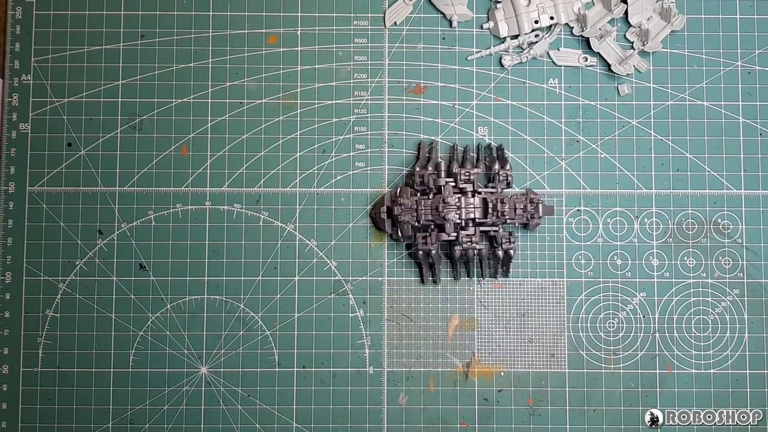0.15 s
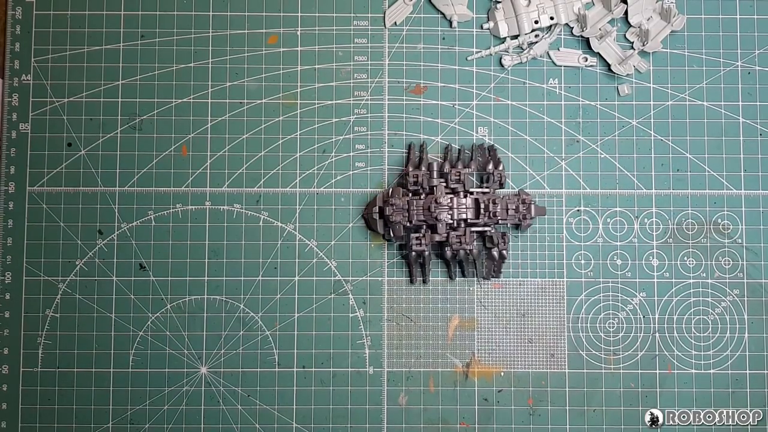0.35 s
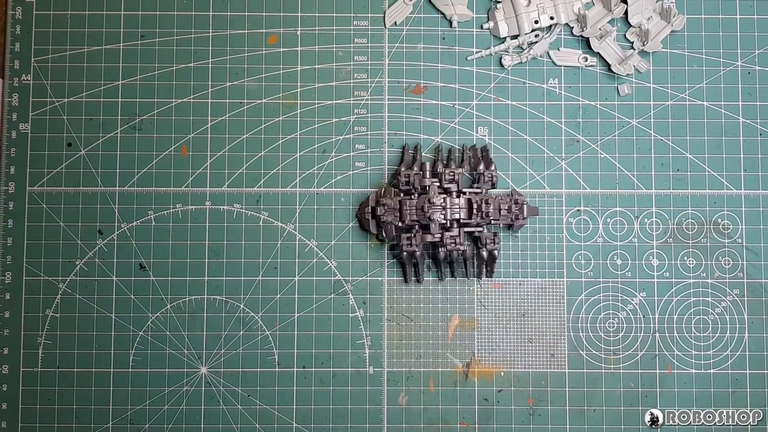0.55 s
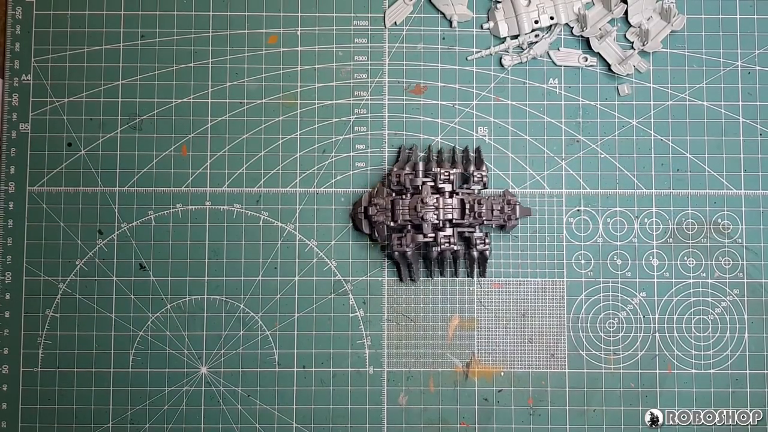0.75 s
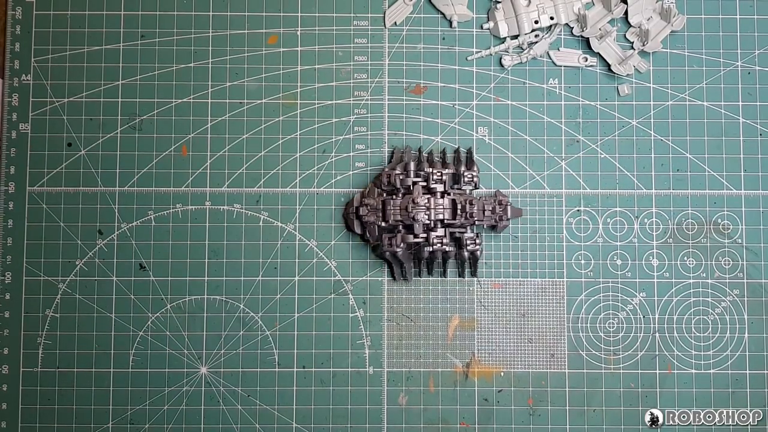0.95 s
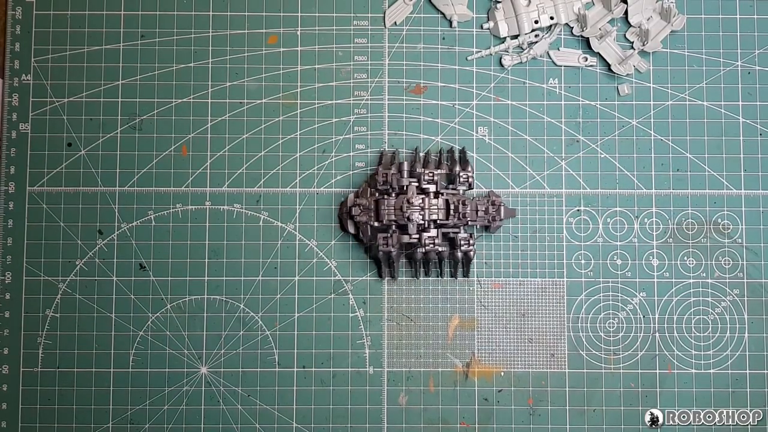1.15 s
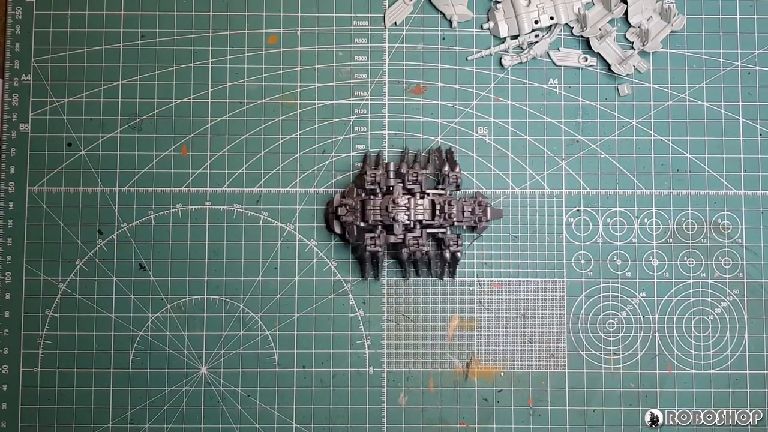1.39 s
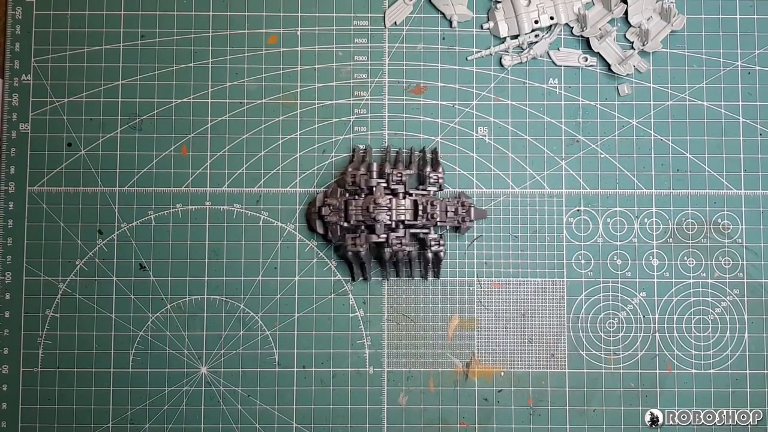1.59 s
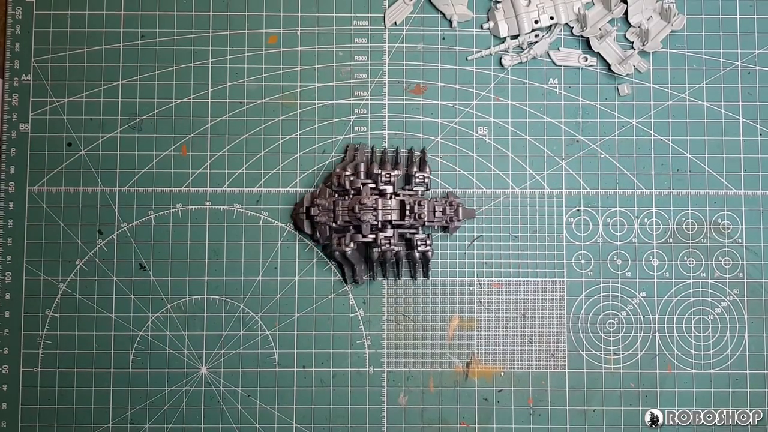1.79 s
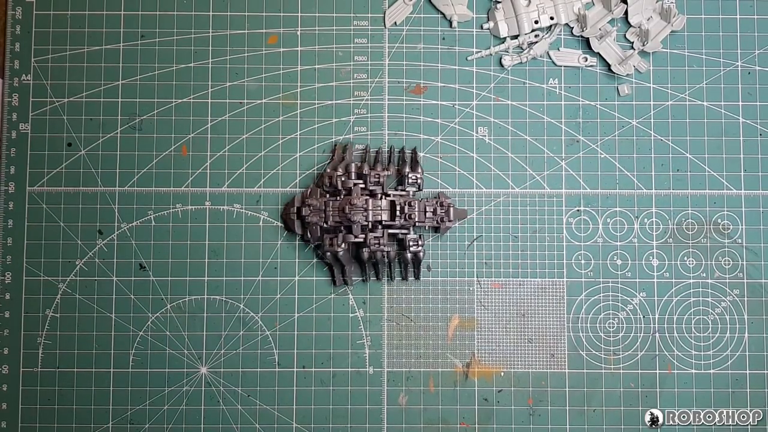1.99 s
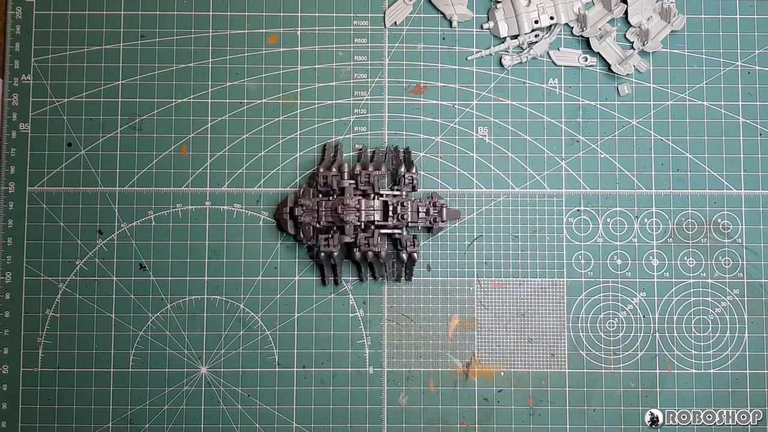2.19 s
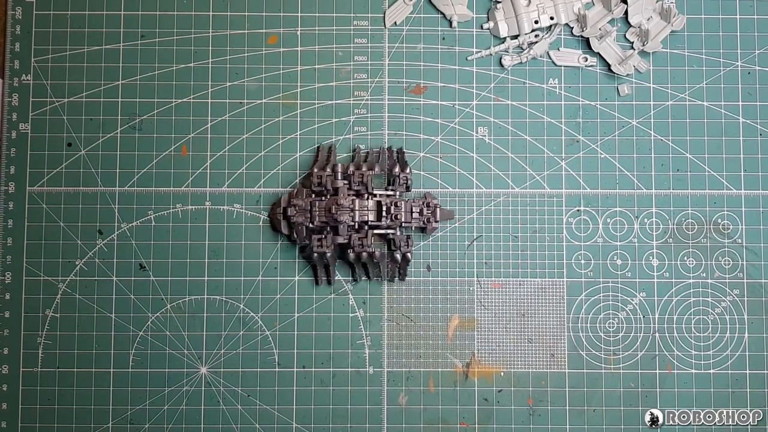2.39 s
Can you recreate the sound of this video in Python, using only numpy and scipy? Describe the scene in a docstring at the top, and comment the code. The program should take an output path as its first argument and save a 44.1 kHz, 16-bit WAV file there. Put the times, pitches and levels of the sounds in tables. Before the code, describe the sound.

A small wind-up toy's gearbox whirs throughout, a thin, bright, buzzing rattle with hiss and little body. It dips in speed near 0.15 s, labours rougher and slightly quieter from 0.65 to 1.1 s, runs freer and a bit louder around 1.4-1.8 s, then slows towards 2.3 s. Faint dense foot scuffs swell underneath, most around 1.2-1.8 s. Quiet room air and faint low hum; close, dry, mono.

```python
"""In a quiet room, a small wind-up plastic walker crosses a cutting mat.
Its fast gear meshes some 420-690 teeth a second: each contact knocks and slides, and so drives
the resonances of the plastic shell, whose colour shifts with the stride. The feet scuff in dense random
grains that ring mat and body. Beneath lie soft coloured air noise and a faint hum of narrow-band noise."""
import sys
import numpy as np
from scipy import signal
from scipy.fft import rfft, irfft
from scipy.io import wavfile
from scipy.ndimage import uniform_filter1d

SR = 44100
rng = np.random.default_rng(int(sys.argv[2]) if len(sys.argv) > 2 else 0)


def generate_wav(signal):
    """Clip the signal to [-1, 1] and save it as 16-bit WAV at the path in sys.argv[1]."""
    frames = np.transpose(np.atleast_2d(signal))
    scaled = np.clip(frames, -1, 1) * 32767
    pcm = np.round(scaled).astype(np.int16)
    wavfile.write(sys.argv[1], SR, pcm)


def gain_from_decibels(decibels):
    """Convert decibel values to linear amplitude factors."""
    exponent = np.asarray(decibels, float) / 20
    return 10 ** exponent


N = 107559  # samples


def rms_one(x):
    """Normalization of a signal to unit root-mean-square."""
    return x / np.sqrt(np.mean(x ** 2) + 1e-20)


def in_time(rows):
    """Piecewise-linear envelopes: the first column is time in seconds, each other one becomes a curve."""
    seconds, *columns = np.transpose(rows)
    return [np.interp(np.arange(N) / SR, seconds, column) for column in columns]


def drift(rate_hz):
    """Low-pass random fluctuation of unit rms: white noise through two equal one-pole filters."""
    # computed at every 20th sample, then interpolated
    pole = np.exp(-2 * np.pi * rate_hz * 20 / SR)
    noise = rng.standard_normal(N // 20 + 4002)
    slow = signal.lfilter([1], [1, -2 * pole, pole * pole], noise)[4000:]  # without the onset
    return np.interp(np.arange(N) / 20, np.arange(len(slow)), rms_one(slow))


def resonate(x, hz, width_hz):
    """Damped resonance: a two-pole band-pass applied twice, with a gain near 1 at its peak."""
    r = np.exp(-np.pi * width_hz / SR)
    feedback = [1, -2 * r * np.cos(2 * np.pi * hz / SR), r * r]
    section = [(1 - r * r) / 2, 0, -(1 - r * r) / 2, *feedback]
    return signal.sosfilt([section, section], x)


def teeth(contrast_db):
    """Gear meshing: a contact falls at each whole count of the integrated tooth rate, with jitter.

    Returns the sample, even size and alternately strong and weak size of each contact."""
    # Gear speed, falling under load and rising when the legs swing free.
    # Each row: time in seconds, speed in teeth per second.
    gear_speed = [(0, 690), (.1, 620), (.15, 446), (.2, 655), (.45, 636), (.7, 490), (.8, 495), (1.0, 526),
                  (1.1, 446), (1.28, 586), (1.48, 645), (1.65, 570), (1.98, 633), (2.03, 560), (2.3, 416),
                  (2.44, 480)]
    wobble, jitter = .025, .07  # rms, as shares of the speed and of the tooth spacing
    spread_db = 2.4  # rms scatter of the contact sizes

    speed, = in_time(gear_speed)
    turns = np.cumsum(speed * (1 + wobble * drift(25))) / SR
    count = np.arange(int(turns[-1]))
    chance = rng.standard_normal((len(count), 2))
    at = np.searchsorted(turns, count + jitter * chance[:, 0]).clip(0, N - 1)
    size_db = spread_db * chance[:, 1]
    alternate = count % 2 - .5
    return at, gain_from_decibels(size_db), gain_from_decibels(size_db + contrast_db[at] * alternate)


def gearbox():
    """Forced vibration: tooth knocks and sliding hiss excite shell modes that vary with the stride."""
    # Force on the gear train. Each row: time in seconds, level in dB.
    gear_force = [(0.0, -45), (0.22, -47), (0.5, -47.5), (0.54, -50.5), (0.65, -48), (0.66, -53),
                  (0.69, -48), (0.83, -49.5), (0.83, -48), (0.86, -51.5), (0.88, -47), (0.9, -54),
                  (0.93, -49), (1.32, -49), (1.39, -45.5), (1.81, -46.5), (1.82, -47.5), (2.0, -47.5),
                  (2.01, -49.5), (2.33, -49), (2.44, -50)]
    # Stride that colours the shell. Each row: time in seconds, swing from 0 braced to 1 free,
    # weight shifted forward from 0 to 1, strong-weak contrast of the teeth in dB.
    stride = [(0, 0.34, 0, -15), (.15, 0.28, 0.16, -6.5), (.3, 0.42, 0.14, 2.5), (.5, 0.4, 0, -8),
              (.6, 0.36, 0, 1), (.75, 0.02, .3, 15), (.95, 0.01, 0.44, 0.5), (1.15, 0.6, .3, -7),
              (1.3, 0.63, 0.1, 6), (1.4, .95, 0.1, -4), (1.55, 1, .05, 1), (1.7, 1, 0, -12.5),
              (1.98, 0.83, 0.15, 9), (2.03, 0.72, .95, 28), (2.2, 0.76, 0.99, 3.5), (2.44, .3, 0.94, -3.5)]
    # Shell resonances. Each row: centre in Hz, width in Hz of each filter pass, relative level in dB
    # when braced, dB gained when free, dB gained when forward.
    shell = [(2852, 265, -25, 4.5, 4), (3114, 310, -14.5, 5, 3), (3414, 247, -11, 1.5, 0),
             (3790, 380, -12.5, 5.5, -6.5), (4174, 380, -9, 3, -3.5), (4487, 300, -10.5, 1, -1),
             (4866, 600, -11.5, 3, 2.5), (5720, 880, -17.5, 7, -0.3), (6250, 230, -16.5, 6, 8),
             (6495, 490, -10, 5, -0.2), (6810, 330, -6, 0, -7), (7170, 420, 1.5, -5.5, -0.8),
             (7760, 530, -13, 9.5, -9.5), (8420, 830, -10.5, 0.5, -1.5), (10166, 1020, -9.5, 3.5, -0.4),
             (10700, 730, -13.5, 7, 3), (11340, 540, -12.5, 9, -1), (12070, 800, -17, 4, -5),
             (12960, 800, -14.5, -1, -10), (13800, 690, -14.5, 0, 4), (14350, 790, -12, 1, -4),
             (15200, 700, -15.5, 5, 3.5), (15900, 850, -13, 2, -1)]
    # Share of the drive's power that is knocks, the rest hiss. Each row: frequency in Hz, share from 0 to 1.
    knock_share = [(3000, .35), (5000, .35), (7000, .6), (9000, .72), (15000, .72)]
    limp_low_hz, limp_high_hz = 5800, 8000  # the rings that feel the strong-weak contrast
    knock_scatter_s = .00018  # longest random delay of a knock
    judder_db, judder_hz = 0.42, 12.2  # rms and rate of the common fluctuation
    flicker_db, flicker_hz = 1.22, 11.1  # rms and rate of each ring's own
    shell_low_hz = 2685

    force_db, = in_time(gear_force)
    free, forward, contrast_db = in_time(stride)
    at, even, limping = teeth(contrast_db)
    hiss = rng.standard_normal((len(shell), N))
    out = 0
    for k, (hz, width_hz, braced_db, free_db, forward_db) in enumerate(shell):
        # each resonance receives the knocks with delays and signs of its own
        late, sign = rng.random((len(at), 2)).T
        delay = (late * knock_scatter_s * SR).astype(int)
        size = limping if limp_low_hz < hz < limp_high_hz else even
        knocks = np.zeros(N)
        knocks[np.minimum(at + delay, N - 1)] = size * np.sign(sign - .5)
        share = np.interp(hz, *np.transpose(knock_share))
        drive = np.sqrt(share) * rms_one(knocks) + np.sqrt(1 - share) * hiss[k]
        level_db = braced_db + free * free_db + forward * forward_db
        level_db = level_db + flicker_db * drift(flicker_hz)
        out = out + gain_from_decibels(level_db) * resonate(drive, hz, width_hz)
    out = signal.sosfilt(signal.butter(6, shell_low_hz, "high", fs=SR, output="sos"), out)
    # a level held even by its running rms lets the force alone set the loudness
    steady = out / np.sqrt(uniform_filter1d(out ** 2, size=6001))
    return gain_from_decibels(force_db + judder_db * drift(judder_hz)) * steady


def feet():
    """Friction as random impulses: dense scuffing grains ring mat and body, tilted by the stance."""
    # Weight dragged by the feet. Each row: time in seconds, level in dB, stance index (higher
    # favours the high rings over the low).
    drag = [(0.0, -64, -5), (0.08, -69, -2.5), (0.21, -62.5, -5), (0.37, -64.5, -6.5), (0.55, -66.5, -1.5),
            (0.6, -62.5, -3.5), (0.77, -70.5, -1.5), (1.07, -68, -3), (1.09, -62, -4.5),
            (1.16, -69.5, -3.5), (1.18, -61.5, -3.5), (1.23, -60.5, -3), (1.85, -70.5, -3),
            (1.92, -67.5, -3), (1.95, -72, -3), (2.09, -64.5, -2.5), (2.1, -68.5, -3.5), (2.21, -64, -2.5),
            (2.31, -66.5, -6), (2.34, -61, -4.5), (2.38, -66, -5), (2.44, -65, 1)]
    # Mat and body resonances. Each row: centre in Hz, width in Hz of each filter pass, relative level in dB.
    mat = [(555, 400, -19), (768, 630, -19), (1049, 87, 1), (1187, 296, -3.5), (1416, 187, -4),
           (1534, 90, -2), (1659, 130, -3), (1964, 600, -12.5)]
    grains_per_s = 7000
    wander_db, wander_hz = 2, 2.8  # rms and rate of each ring's fluctuation
    split_hz, stance_gain_db, stance_mean = 1440, 3.7, -4.5  # gain per step of the index

    drag_db, stance = in_time(drag)
    struck = rng.random(N) < grains_per_s / SR
    grains = struck * rng.standard_normal(N) + 1e-9
    tilt_db = stance_gain_db * (stance - stance_mean)  # high rings over low
    out = 0
    for k, (hz, width_hz, db) in enumerate(mat):
        side = np.tanh(8 * np.log2(hz / split_hz)) * (900 < hz < 1800)  # -1 low, 1 high, 0 outside
        level_db = db + tilt_db * side / 2 + wander_db * drift(wander_hz)
        out = out + gain_from_decibels(level_db) * (-1) ** k * resonate(grains, hz, width_hz)  # signs alternate
    steady = out / np.sqrt(uniform_filter1d(out ** 2, size=8001))
    return gain_from_decibels(drag_db) * steady


def air():
    """Spectral shaping: white noise weighted in frequency becomes the soft tone of the room."""
    # Room tone. Each row: frequency in Hz, relative spectral level in dB per Hz.
    room_tone = [(12, -43), (20, -7), (108, -1), (222, -8.5), (375, -15), (468, -17), (549, -12.5),
                 (755, -22.5), (900, -10), (1170, -24), (1980, -120)]
    room_db = -73.5  # rms level

    hz, db = np.transpose(room_tone)
    bins = np.maximum(np.arange(N // 2 + 1) * SR / N, 1)
    weight = gain_from_decibels(np.interp(np.log(bins), np.log(hz), db))
    noise = irfft(rfft(rng.standard_normal(N)) * weight, N)
    return gain_from_decibels(room_db) * rms_one(noise)


def hum():
    """Narrow-band noise: sharp resonances fed with white noise give low tones that waver."""
    # Hum. Each row: centre in Hz, width in Hz of each filter pass, rms level in dB.
    hum_tones = [(50.7, 7.4, -81), (103.4, 7.4, -77), (121.2, 13.4, -81.5), (171.7, 11, -86.5)]

    out = 0
    for hz, width_hz, db in hum_tones:
        tone = resonate(rng.standard_normal(2 * N), hz, width_hz)[N:]  # the settled half
        out = out + gain_from_decibels(db) * rms_one(tone)
    return out


def scene():
    """Linear superposition of all sources in one channel."""
    return (gearbox() + feet() + air() + hum())[None, :]


def roll_off(x):
    """The treble ends steeply here."""
    return signal.sosfilt(signal.butter(12, 16730, fs=SR, output="sos"), x)


def record(dry):
    """Band limiting: a steep elliptic low-pass removes the extreme treble."""
    edge_hz, ripple_db, stop_db = 15720, .5, 70
    low_pass = signal.ellip(14, ripple_db, stop_db, edge_hz, fs=SR, output="sos")
    mix = signal.sosfilt(low_pass, dry)
    return roll_off(mix)


dry = scene()
out = record(dry)
generate_wav(out)
```